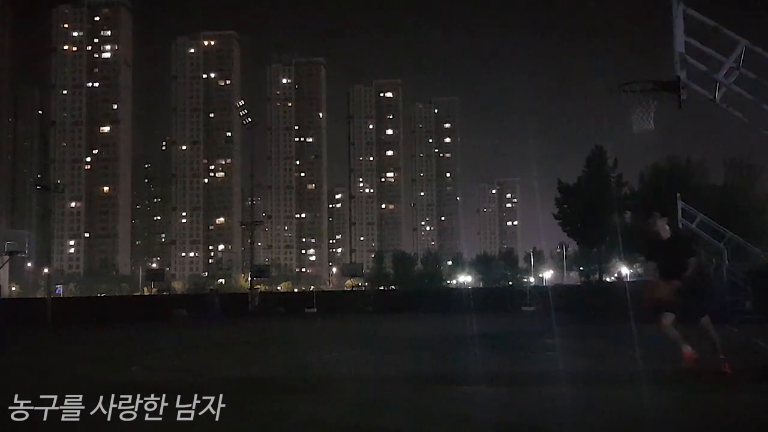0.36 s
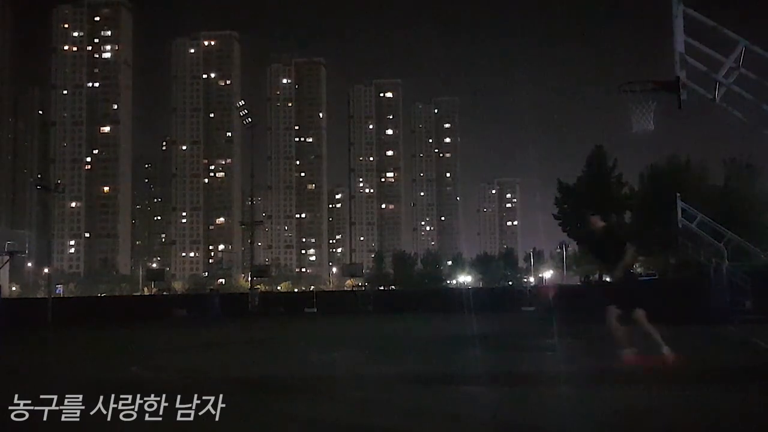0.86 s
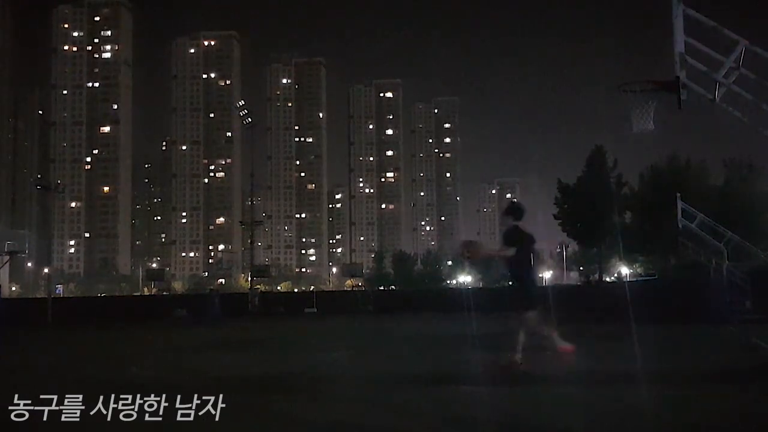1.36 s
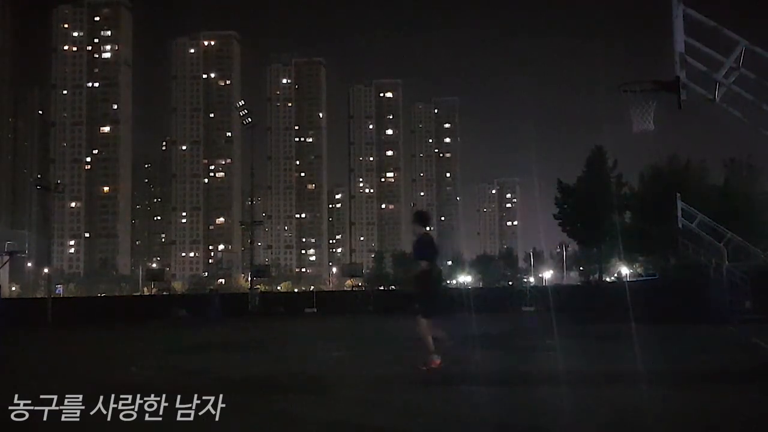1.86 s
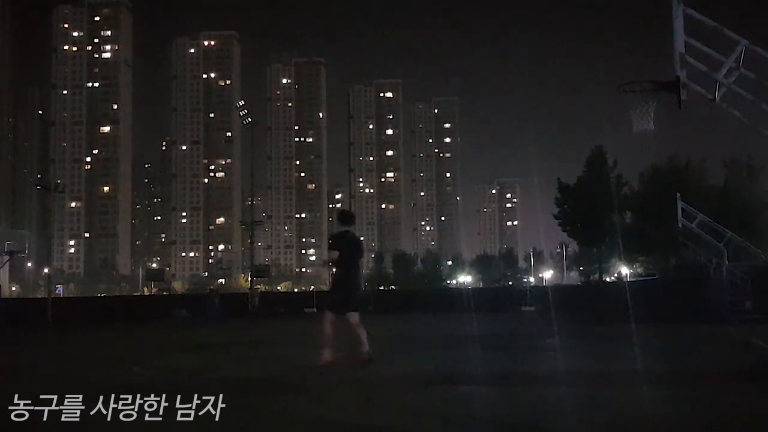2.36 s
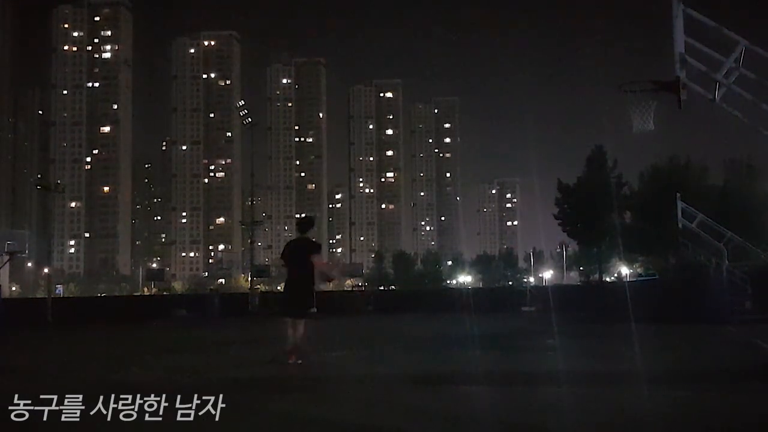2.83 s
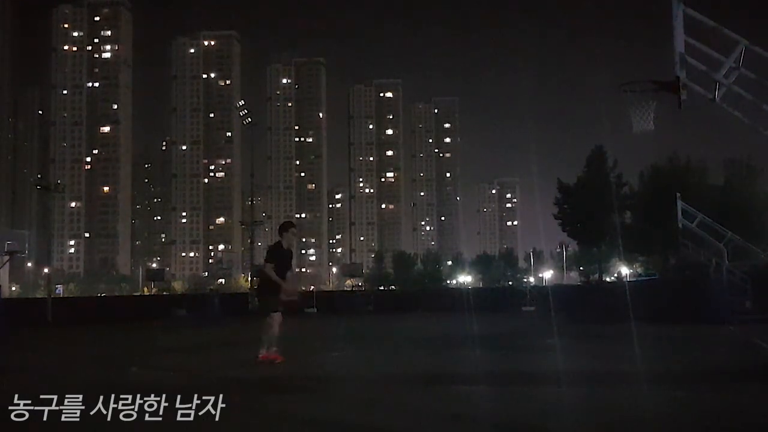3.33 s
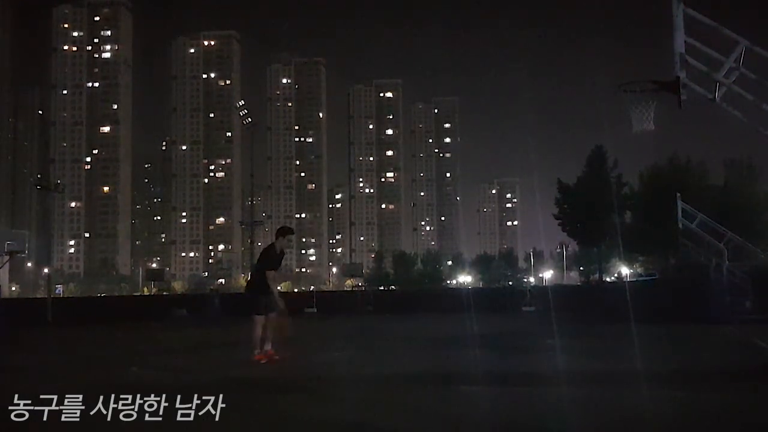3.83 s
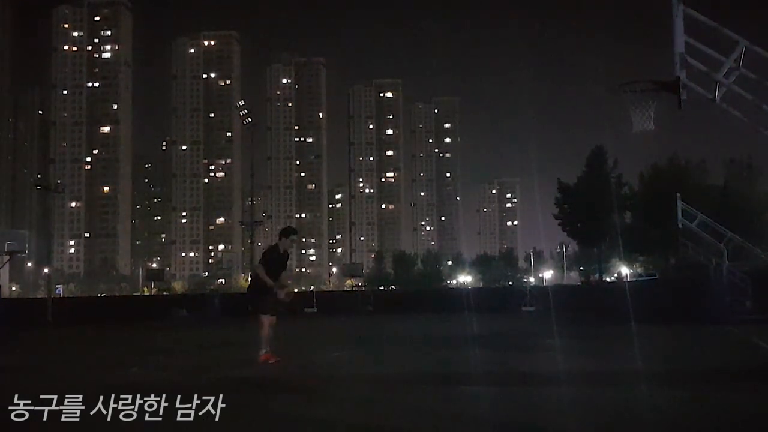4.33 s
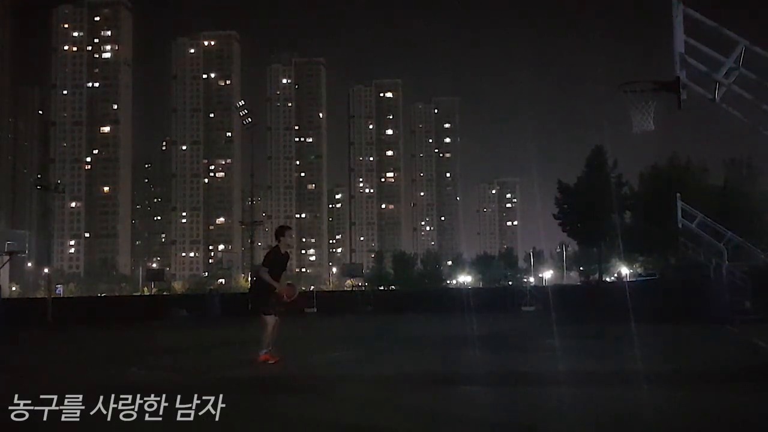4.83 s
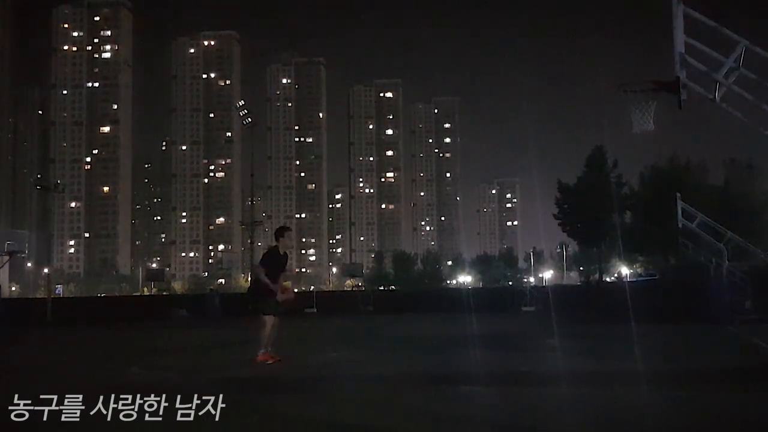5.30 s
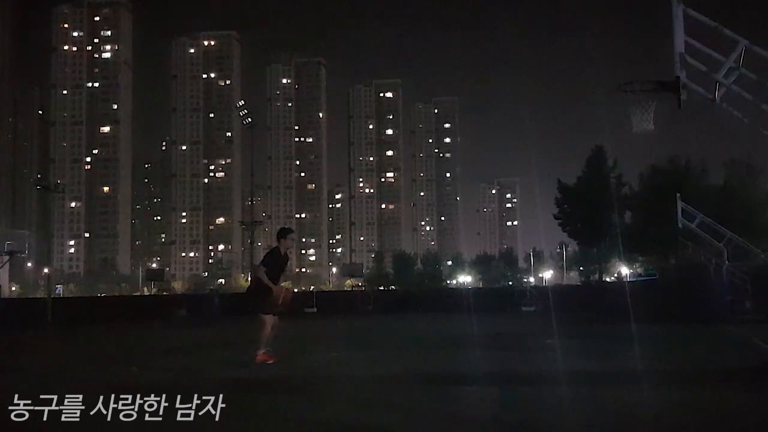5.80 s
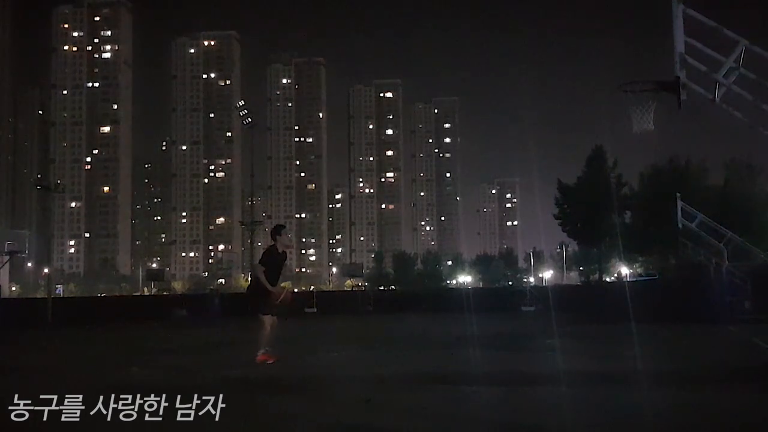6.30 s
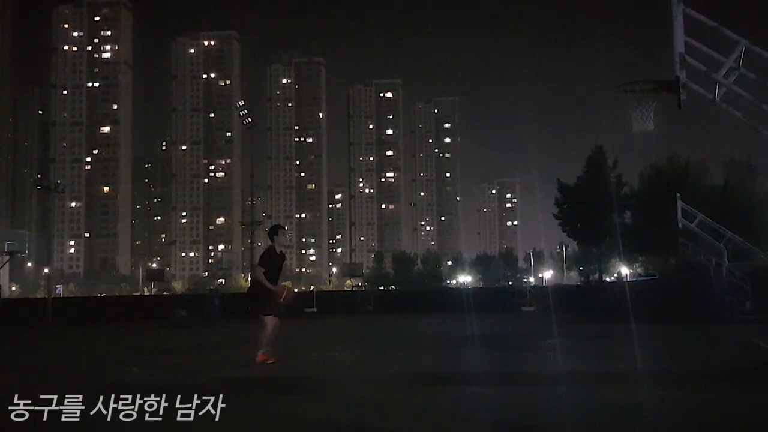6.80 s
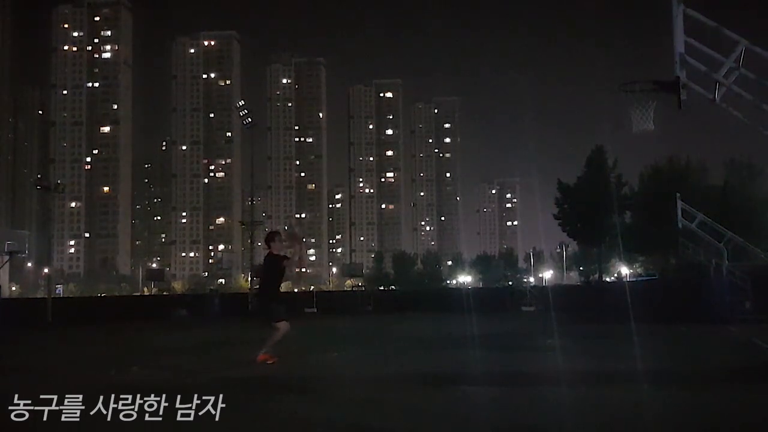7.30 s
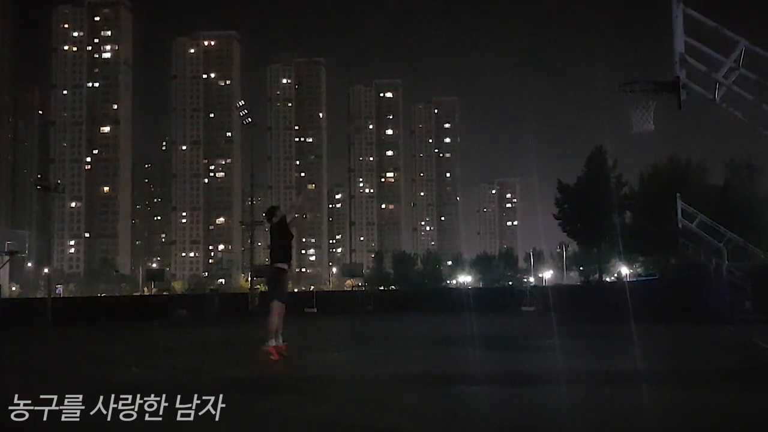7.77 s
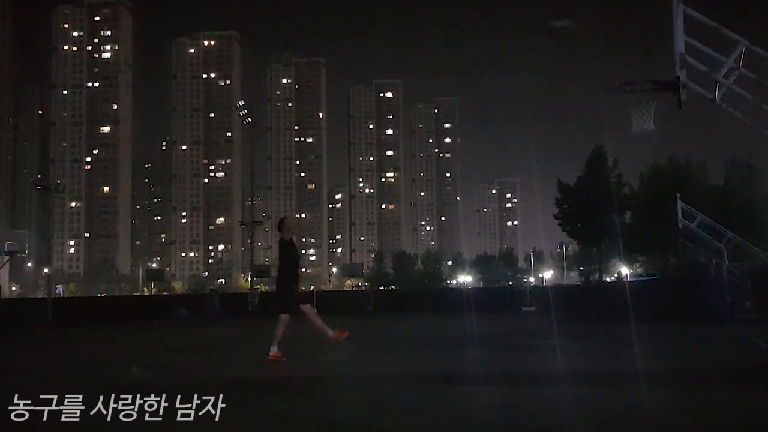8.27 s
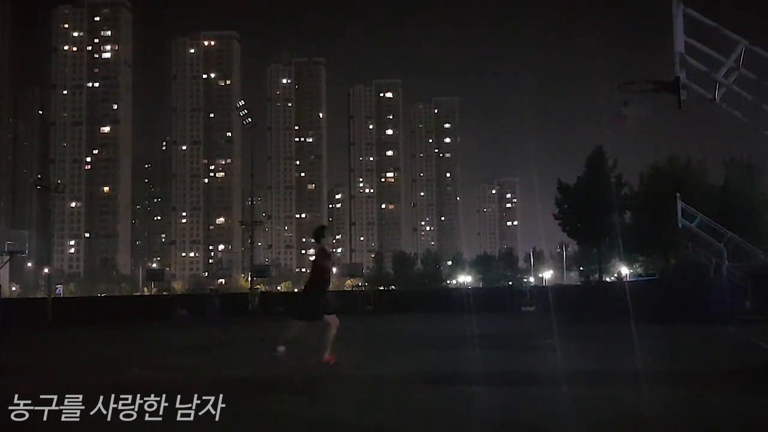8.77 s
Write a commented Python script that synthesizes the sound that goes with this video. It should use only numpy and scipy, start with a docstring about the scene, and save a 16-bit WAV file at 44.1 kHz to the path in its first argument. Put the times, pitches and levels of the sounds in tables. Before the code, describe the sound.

A basketball is dribbled in sharp, separate bounces on an open outdoor court at night, then a shot strikes the board and rattles the loose hoop frame.

```python
"""A ball is dribbled and shot on an open-air court at night, a few metres from a phone with two spaced microphones.
Each bounce is a slap of decaying modes, a squashed low thump and a short ring of the air inside.
Hands catch with damped knocks, soles scuff as jerky coloured noise, and the shot hits the board and rattles
the loose frame as chattering noise through resonances. Things close by, fences and far fronts scatter it back.
Behind lie town rumble, a fading drone, a wavering insect band, faint hiss and one faint call, all filtered noise."""
import sys
import numpy as np
from scipy import signal
from scipy.fft import rfft, irfft, next_fast_len
from scipy.io import wavfile
from scipy.ndimage import uniform_filter1d

SR = 44100
rng = np.random.default_rng(int(sys.argv[2]) if len(sys.argv) > 2 else 0)


def volts(x):
    """Linear amplitude factor 10**(x/20) for a level x in dB, scalar or array-like."""
    e = np.asarray(x, float) / 20
    return 10 ** e


def put_to_file(sound):
    """Save the sound as 16-bit audio at rate SR, in the file named by the first command-line argument."""
    columns = np.atleast_2d(sound).T  # one column per channel
    safe = np.clip(columns, -1, 1)
    whole_steps = np.round(safe * 32767)
    wavfile.write(sys.argv[1], SR, whole_steps.astype(np.int16))


N = 392003  # length in samples
SPACING_M = 0.16  # between the two microphones
FRAME_S = 8.55  # the frame is silent before this; later blows are at the hoop


def level(x, db):
    """Set the rms level."""
    return x * volts(db) / np.sqrt(np.mean(x ** 2))


def colour(x, points):
    """Shape the spectrum through (Hz, dB) points, straight lines over log frequency."""
    size = next_fast_len(x.shape[-1])
    hz, db = np.transpose(points)
    bins_hz = np.arange(size // 2 + 1) * SR / size
    gain = volts(np.interp(np.log(bins_hz + 1), np.log(hz), db))
    return irfft(rfft(x, size) * gain, size)[..., :x.shape[-1]]


def band(x, hz, width):
    """One resonance, gain 1 at the centre."""
    return signal.lfilter(*signal.iirpeak(hz, hz / width, SR), x)


def steep_band(x, hz, width):
    """The same resonance twice over, for steeper skirts."""
    return band(band(x, hz, width), hz, width)


def walk(rate, size=N):
    """Random levels held 1 / rate s and slewed; spread near 1."""
    k = int(SR / rate)
    return uniform_filter1d(np.repeat(rng.standard_normal(size // k + 1), k), k)[:size]


def swell(t, start, rise, hold, t60):
    """Silent until start, a short rise, held a while, then a steady decay."""
    late = np.clip(t - start, 0, None)
    return (1 - np.exp(-late / rise)) * 1000. ** (-np.clip(late - hold, 0, None) / t60)


def ring(t, modes, scatter_db):
    """Decaying modes, struck a little differently each time."""
    out = 0
    for hz, db, t60 in modes:
        strength = volts(db + scatter_db * rng.standard_normal())
        out = out + strength * np.sin(2 * np.pi * hz * t) * 1000. ** (-t / t60)
    return out


# The ball's skin at first contact, suction pulse first, then the crack.
# Each row: frequency in Hz, relative level in dB, decay time t60 in seconds (the pulse may linger).
SKIN_MODES = [(1104, 1.5, 0.0025), (4600, 0, 0.0015), (6760, -4.5, 0.0017), (10720, -7, .002),
              (13500, -18, .004)]


def slap(t, crack_db, linger=1.):
    """First contact: a short suction pulse and a crack of skin; neighbouring modes start opposed, leaving no gaps."""
    (hz, db, t60), *crack = SKIN_MODES
    pulse = ring(t, [(hz, db, linger * t60)], scatter_db=3.6)
    for k, mode in enumerate(crack):
        pulse -= (-1) ** k * volts(crack_db) * ring(t, [mode], scatter_db=3.0)
    return -1.8 * pulse * np.minimum(t / 0.00018, 1)


# The air inside the ball, heard in bounces and, cut shorter, in catches.
# Each row: frequency in Hz, relative level in dB, decay time t60 in seconds.
AIR_MODES = [(811, 2, 0.044), (1110, -4.5, .045), (1654, -7.5, .045), (1845, -21.5, 0.021),
             (2180, -23.5, 0.028)]
AIR_DB = -15.5  # the air rings in step with the thump
CONTACT_S = .0135  # how long the ball stays squashed


def bounce(thump_db, hz, slap_db, crack_db):
    """The shell swings one and a half times, slowing, until it peels off and goes quiet."""
    t = np.arange(int(.15 * SR)) / SR
    wait = max(CONTACT_S - 1.5 / hz, .0012)
    sunk = (wait / 0.0015) ** .7  # a shell that sinks in longer lets the slap linger and wobbles more after
    late = np.clip(t - wait, 0, None)
    turns = hz * (late + 0.0011 * (1 - np.exp(-late / 0.0018)))
    contact = 1 / (1 + np.exp((turns - 1.56) / 0.019))  # 1 while squashed, then 0
    swing = np.sin(2 * np.pi * turns)
    thump = np.tanh(0.89 * swing) * np.exp(-late / 0.056) * contact
    thump += 0.098 * (1 - contact) * swing * np.exp(-late / 0.022)
    wobble = [(227.1, -11.0, 0.075), (93.2, -18 + 20 * np.log10(sunk), 0.13)]
    thump += ring(late, wobble, scatter_db=2)
    thump -= 0.4 * np.sin(np.pi * np.minimum(t / wait, 1))  # the shell sinks in before it swings out
    peel = volts(-15.0) * slap(np.clip(t - 0.65 * CONTACT_S, 0, None), crack_db)
    air = volts(AIR_DB) * ring(t, AIR_MODES, scatter_db=3.1) * np.minimum(t / 0.003, 1)
    return volts(thump_db) * (thump + air) + volts(slap_db) * (slap(t, crack_db, linger=sunk) + peel)


# The ball on ground or board, before it is placed on the court.
# Each row: start in seconds, thump level in dB, thump frequency in Hz, slap level in dB,
# crack level in dB against the slap.
BOUNCES = [(1.094, -3, 119.7, -2, -11), (2.4807, -4.5, 157.8, -8, -14), (3.8407, -6, 109.7, -11.5, -3.5),
           (4.6126, -5, 114, -2, -18.5), (5.5676, -5, 116, -3.5, -14.5), (8.556, -13.5, 104.5, -11, -13)]


def add_bounces(out):
    """Dribbles where the player stands; the shot at the hoop."""
    for s, *blow in BOUNCES:
        add(out, s, bounce(*blow), -3.0, HOOP if s > FRAME_S else player(s))


def catch(db, hz, ring_hz, skin_db):
    """A palm damps the shell: a few cycles of knock, a tick of skin, and the air modes nearest the blow."""
    t = np.arange(int(.12 * SR)) / SR
    palm_t60_s, palm_rise_s = .038, 0.0024
    modes = [(hz, 0, palm_t60_s), (0.572 * hz, -3.5, palm_t60_s), (1.66 * hz, -8, .025)]
    knock = ring(t, modes, scatter_db=3.0)
    near = [(f, -15 - 55 * np.log2(f / ring_hz) ** 2, .7 * t60) for f, _, t60 in AIR_MODES]
    air = ring(t, near, scatter_db=1)
    tick = volts(skin_db) * slap(np.clip(t - .0018, 0, None), crack_db=-2.0)
    rise = np.sin(np.pi / 2 * np.minimum(t / palm_rise_s, 1)) ** 2
    return volts(db) * (rise * (knock + air) + tick)


# The ball in the hands, and light footfalls, before they are placed on the court.
# Each row: start in seconds, level in dB, knock frequency in Hz, ring frequency in Hz,
# skin tick level in dB against the rest.
CATCHES = [(.101, -42.5, 1033, 1620, -10), (.365, -9.5, 426, 830, -9.5), (.64, -36.5, 471, 1520, -6),
           (1.46, -47, 873, 1640, -20), (1.9319, -10, 296, 1770, -21), (3.1405, -23, 375, 970, -31),
           (3.967, -41, 725, 1100, -21), (5.008, -31, 392, 983, -30), (5.928, -23, 345, 1110, -35)]


def add_catches(out):
    """Hands and feet, where the player stands."""
    for s, *touch in CATCHES:
        add(out, s, catch(*touch), -1.5, player(s))


# Spectrum of the rubber sole. Each row: frequency in Hz, relative level in dB per Hz.
RUBBER = [(350, -35), (600, -18.5), (885, -18.5), (1100, -23.5), (1610, -9.5), (2070, -15.5), (4000, -46.5),
          (5200, -75), (8800, -120)]
# Spectrum of the grit underfoot. Each row: frequency in Hz, relative level in dB per Hz.
GRIT = [(240, -26), (400, -4.5), (814, 1.5), (1060, -5), (2360, 4), (3210, -6), (3810, -0.5), (5780, -7.5),
        (9320, -11.5), (13300, -16), (16000, -21)]
SLIDE_ATTACK, SLIDE_LATE_DB = 0.26, -14  # share of a slide until full grip; level three quarters through


def scuff(length, rubber_db, grit_db, hiss_db):
    """The sole drags in uneven jerks over loose grit."""
    size = int(length * SR)
    slide = np.interp(np.linspace(0, 1, size), [0, SLIDE_ATTACK, .75, 1], [0.01, 1, volts(SLIDE_LATE_DB), 0])
    burst_db = np.minimum(3 * rng.exponential(size=(3, size)), 13)
    grains = rng.standard_normal((3, size)) * volts(burst_db)
    rub = level(colour(grains[0], RUBBER), rubber_db)
    rub += level(colour(grains[1], GRIT), grit_db)
    rub += level(steep_band(grains[2], 6600, 1500), hiss_db)
    return rub * slide * volts(3 * walk(90, size=size))


# Soles sliding; levels are before the slide's shape and jerks.
# Each row: start in seconds, length in seconds, rubber level in dB, grit level in dB, hiss level in dB.
SCUFFS = [(0.128, 0.016, -85, -61, -69), (0.194, 0.07, -42.5, -40.5, -47.5), (0.223, .11, -60, -31.5, -65),
          (0.275, 0.017, -63, -40, -48), (0.648, 0.057, -57.5, -69.5, -74), (2.081, 0.11, -72, -77, -85),
          (2.131, 0.05, -64, -66.5, -71), (2.238, .006, -65.5, -75.5, -101), (2.38, 0.0068, -69, -66, -79),
          (2.405, .006, -66, -65, -86), (2.526, 0.036, -29, -36, -49), (2.649, 0.012, -47, -48.5, -52),
          (3.307, 0.11, -59.5, -53.5, -62), (3.501, 0.085, -46, -71, -90), (5.008, 0.0073, -76, -71, -57),
          (5.029, 0.035, -69, -79, -79)]


def add_scuffs(out):
    """Slides, where the player stands."""
    for s, *slide in SCUFFS:
        add(out, s, scuff(*slide), -2.5, player(s))


# Hard knocks in the frame. Each row: start in seconds, noise level in dB before its envelope,
# frequency in Hz, time to the peak and decay constant in seconds.
CLANKS = [(8.5572, -11, 2490, 0.00019), (8.582, -25, 5360, 0.0017), (8.584, -21, 790, 0.0016),
          (8.616, -15, 1490, 0.0019), (8.617, -21.5, 5300, 0.0014), (8.639, -35, 3530, 0.0017),
          (8.769, -27, 3920, 0.0025), (8.788, -35, 910, 0.008), (8.776, -32, 2800, 0.0024),
          (8.823, -27.5, 3600, 0.00033)]


def add_clanks(out, first):
    """Short noise bursts through a broad resonance; sample `first` of the scene is where out begins."""
    t = np.arange(1500) / SR
    for s, db, hz, decay in CLANKS:
        j = int(s * SR) - first
        burst = steep_band(rng.standard_normal(len(t)), hz, hz / 0.78)
        out[j:j + len(t)] += level(burst, db) * t / decay * np.exp(1 - t / decay)


# Resonances of the steel. Each row: frequency in Hz, width in Hz, relative level in dB.
STEEL = [(660, 350, -1), (1460, 130, 13), (2200, 480, -5), (3620, 65, 3), (4600, 110, -19),
         (4700, 39, -16.5)]
# Spectrum of the jangle. Each row: frequency in Hz, relative level in dB per Hz.
JANGLE = [(260, -43), (450, -34), (664, 4), (1170, -3), (1470, -6.5), (1830, -1.5), (4300, -5),
          (11000, -31), (16000, -35)]
# The ball jolts the loose frame, which shakes on.
# Each row: start in seconds, chatter gain in dB, board boom gain in dB, decay time t60 in seconds.
JOLTS = [(8.574, -23.5, -27.5, 0.36), (8.611, -29, -25.5, 0.45), (8.765, -29, -36, 0.14)]
JOLT_RISE_S = 0.0057


def frame():
    """Loose joints, hoop and net chatter and ring the steel; the board booms on; a few knocks stand out."""
    i = int(FRAME_S * SR)
    size = N - i
    now = np.arange(i, N) / SR
    shake, drum = sum(volts(np.array(db))[:, None] * swell(now, s, JOLT_RISE_S, 0, t60) for s, *db, t60 in JOLTS)
    burst_db = np.minimum(9.0 * rng.exponential(size=size), 12)
    chatter = rng.standard_normal(size) * volts(burst_db + 3.8 * walk(148, size=size))
    steel = sum(volts(db) * band(chatter, hz, width) for hz, width, db in STEEL)
    out = (level(steel, -6.0) + level(colour(chatter, JANGLE), -0.86)) * shake
    boom = band(band(rng.standard_normal(size), 160, 126), 233, 92)
    out += level(boom, 0) * drum
    add_clanks(out, i)
    return out


# The player walks from the hoop across the view.
# Each row: time in seconds, bearing in degrees right of ahead, change of echo level in dB.
PLAYER = [(0.598, 20.5, -7), (1.1, 8.5, -5.5), (1.9, 4, -4), (3.8, -5.5, -2)]
# The hoop's place: bearing in degrees right of ahead, change of echo level in dB.
HOOP = (20.2, 0)


def player(s):
    """Bearing and echo change of the player at a moment."""
    times, *place = np.transpose(PLAYER)
    return [np.interp(s, times, column) for column in place]


def around(size):
    """Noise from all round the horizon: two spaced microphones agree in the bass only."""
    fast = next_fast_len(size)
    kd = 2 * np.pi * np.arange(fast // 2 + 1) * SR / fast * SPACING_M / 343  # spacing in radians of wave
    alike = np.mean(np.cos(kd[:, None] * np.cos(np.linspace(0, np.pi, 24))), axis=1) * (kd < 30)
    mid, side = rfft(rng.standard_normal((2, fast)))
    mid = mid * np.sqrt((1 + alike) / 2)
    side = side * np.sqrt((1 - alike) / 2)
    return irfft(np.array([mid + side, mid - side]), fast)[:, :size]


# What scatters the sound back: things close by, the fence, the far fronts.
# Each row: first echo in seconds, last echo in seconds, relative level in dB, decay t60 after that in seconds.
REFLECTORS = [(.003, 0.023, -26.5, 0.089), (0.017, 0.06, -29, 0.11), (0.078, .19, -44.5, .3)]
# Spectrum of all these echoes. Each row: frequency in Hz, gain in dB.
ECHO_COLOUR = [(60, -22.5), (200, -19.5), (500, -11), (1200, -13), (2200, -4), (3200, -6), (5000, -6),
               (7500, -8), (8200, -27.5)]
# Extra treble of the echoes, fading on longer paths. Each row: frequency in Hz, gain in dB before the air's loss.
ECHO_TOP = [(6000, -38.5), (8000, -5.5), (16000, -11)]
# A swell off the tall house fronts; the path length below keeps only its onset.
# The row: delay in seconds, spread in seconds, relative level in dB, frequency in Hz, width of each pass in Hz.
FRONTS = (0.97, 0.21, -41, 2102.5, 1003)
EDGE_S, ECHO_S = .004, 0.59  # how soon an echo builds up; the longest path
TOP_LOSS_DB_PER_S = 31.5  # air eats the extra treble on long paths


def court_echo():
    """Scattered paths as fading noise, different at the two microphones and new for each sound."""
    t = np.arange(int(ECHO_S * SR)) / SR
    fade = sum(volts(db) * swell(t, first, EDGE_S, last - first, t60) for first, last, db, t60 in REFLECTORS)
    paths = around(len(t))
    top = colour(paths, ECHO_TOP) * volts(-TOP_LOSS_DB_PER_S * t)
    court = fade * (colour(paths, ECHO_COLOUR) + top)
    late, spread, swell_db, hz, width = FRONTS
    court += steep_band(paths, hz, width) * volts(swell_db) * np.exp(-((t - late) / spread) ** 2)
    return court


def add(out, s, x, echo_db, place):
    """Place a sound: direct to both microphones with a lag between them, then its scattered echo."""
    degrees, far_db = place
    both = signal.fftconvolve(x[None], volts(echo_db + far_db) * court_echo(), axes=1)
    size = next_fast_len(len(x) + 64)
    half_lag = SPACING_M * np.sin(np.radians(degrees)) / 343 * SR / 2
    lags = np.array([[1], [-1]]) * half_lag + 16  # samples; 16 of room, taken back below
    turn = np.exp(-2j * np.pi * np.arange(size // 2 + 1) / size * lags)
    both[:, :size] += irfft(rfft(x, size) * turn, size)
    i = int(s * SR) - 16
    out[:, i:i + both.shape[1]] += both[:, :N - i]


# One faint insect call. The row: start in seconds, length in seconds,
# then a list of tones, each a frequency in Hz and a level in dB before the fade.
CHIRP = (7.86, .1, [(3100, -78), (4650, -76)])


def chirp():
    """Two narrow noise bands swell and fade together."""
    _, length, tones = CHIRP
    size = int(length * SR)
    call = sum(level(steep_band(rng.standard_normal(size), hz, 260), db) for hz, db in tones)
    return np.hanning(size) * call


# Insect band near 5 kHz, and a faint hiss band near 9 kHz.
# Each row: frequency in Hz, width of each pass in Hz, level in dB before it wavers.
HIGH_BANDS = [(5030, 520, -79.5), (8900, 790, -90)]


def insects_and_faint_hiss():
    """Two noise bands, alike at both microphones in the bass only, each wavering by itself."""
    out = 0
    for hz, width, db in HIGH_BANDS:
        out = out + level(steep_band(around(N), hz, width), db) * volts(1.5 * walk(7.8))
    return out


def drone():
    """A distant idling drone that draws away: a narrow low band, alike at both microphones."""
    fade_db_per_s, swell_db = 1.2, 3.5
    fading_db = -47.5 - fade_db_per_s * np.arange(N) / SR + swell_db * walk(1.2)
    hum = band(band(rng.standard_normal(N), 73.4, 7.3), 73.3, 7.3)
    return level(hum, 0) * volts(fading_db)


# Spectrum of the town, far off. Each row: frequency in Hz, relative level in dB per Hz.
TOWN = [(12, -58.5), (20, -33.5), (42, -5.5), (67, 1.5), (157, -10), (274, -17.5), (501, -22.5),
        (548, -26.5), (600, -26), (858, -27.5), (1400, -33), (4200, -64.5), (5460, -87.5), (9240, -120)]


def town():
    """Traffic rumble from all round, slowly swelling by a fraction of a dB."""
    return level(colour(around(N), TOWN), 0) * volts(-44.64 + 0.7 * walk(1.574))


def scene():
    """All sources on the court, heard a little louder on the left."""
    left_db = 2.5  # left over right
    out = town() + drone() + insects_and_faint_hiss()
    add_bounces(out)
    add_catches(out)
    add_scuffs(out)
    add(out, FRAME_S, frame(), -7, HOOP)
    add(out, CHIRP[0], chirp(), -8, (0, 0))  # straight ahead
    return out * volts(np.array([[left_db], [-left_db]]) / 2)


# Spectrum of the microphone noise. Each row: frequency in Hz, relative level in dB per Hz.
HISS = [(2000, -28), (3500, -0.5), (7000, -12), (10500, -7.5), (12500, -0.5), (16000, -2.5)]


def microphone_hiss():
    """Self-noise, separate in the two microphones."""
    return level(colour(rng.standard_normal((2, N)), HISS), -75)


def roll_off(x):
    """The treble ends steeply here."""
    return signal.sosfilt(signal.butter(12, 16660, fs=SR, output="sos"), x)


def record(dry):
    """The microphones add their hiss and lose the deepest bass and the very top."""
    wet = signal.sosfilt(signal.butter(2, 36, "high", fs=SR, output="sos"), dry)
    wet = np.tanh(0.71 * wet) / 0.66  # the loudest peaks are rounded
    wet = wet + microphone_hiss()
    wet = signal.sosfilt(signal.ellip(8, .3, 60, 15800, fs=SR, output="sos"), wet)
    return roll_off(wet)


dry = scene()
out = record(dry)
put_to_file(out)
```